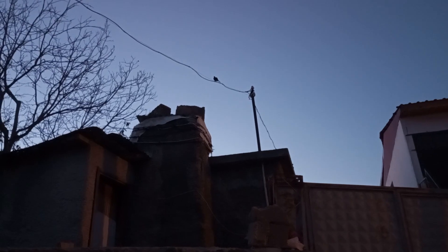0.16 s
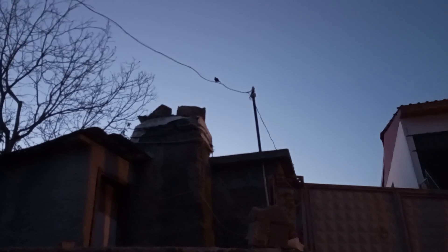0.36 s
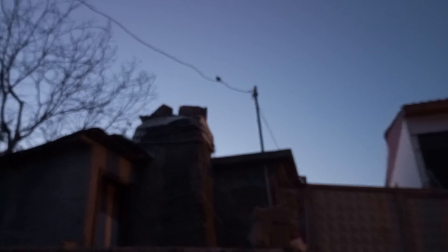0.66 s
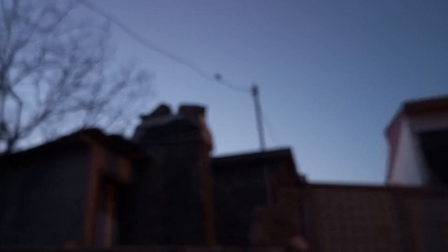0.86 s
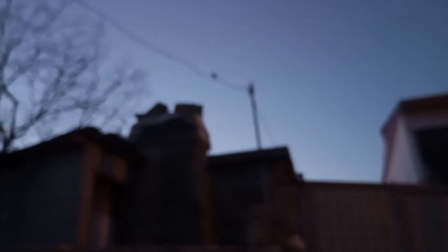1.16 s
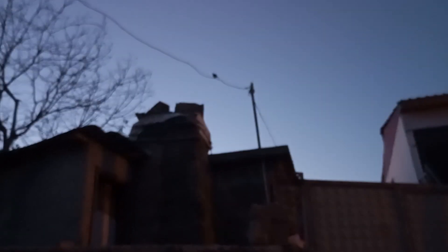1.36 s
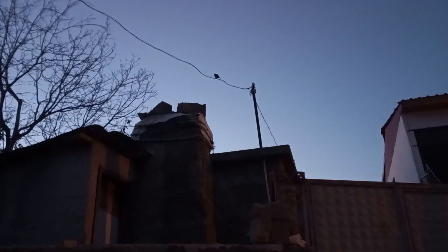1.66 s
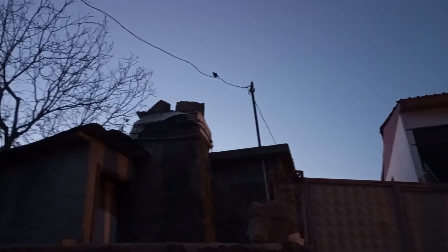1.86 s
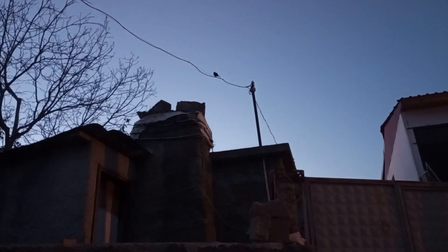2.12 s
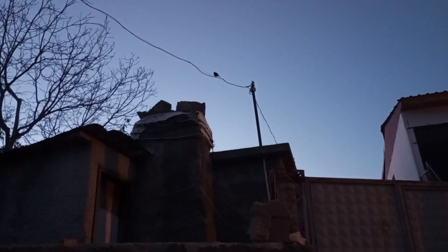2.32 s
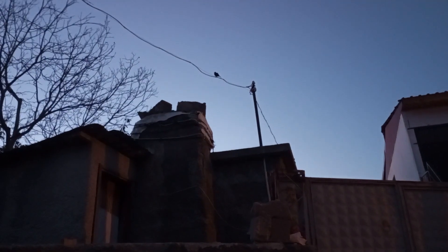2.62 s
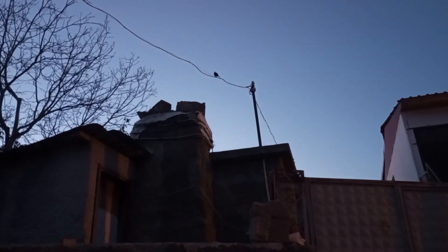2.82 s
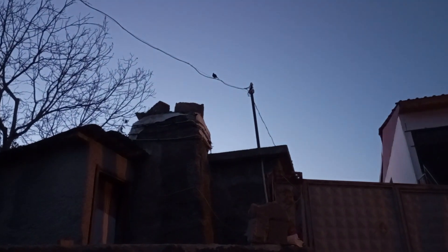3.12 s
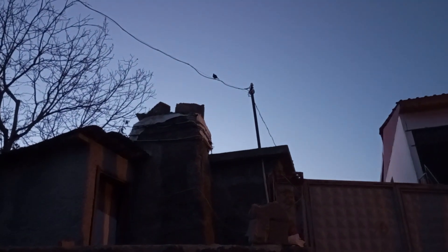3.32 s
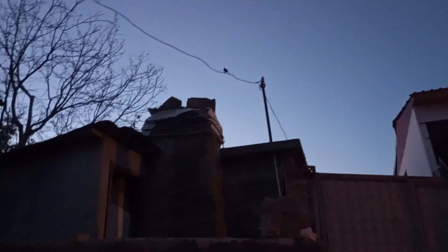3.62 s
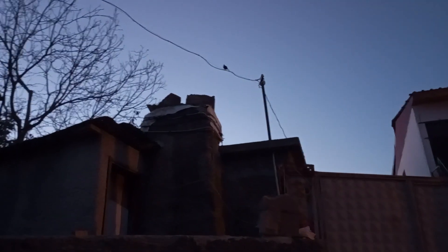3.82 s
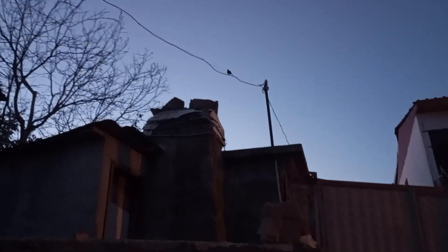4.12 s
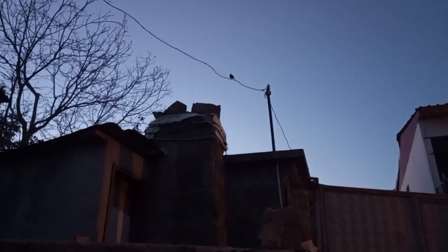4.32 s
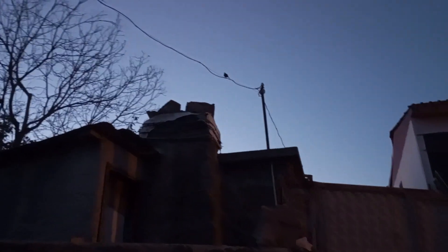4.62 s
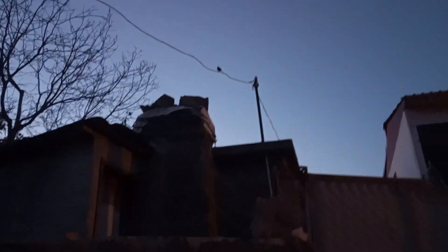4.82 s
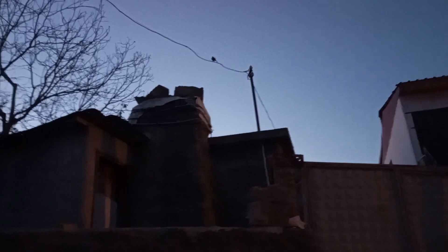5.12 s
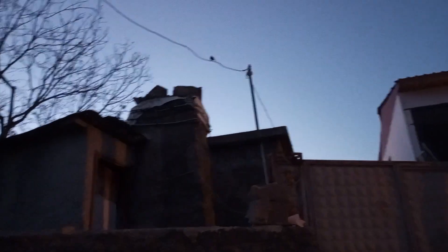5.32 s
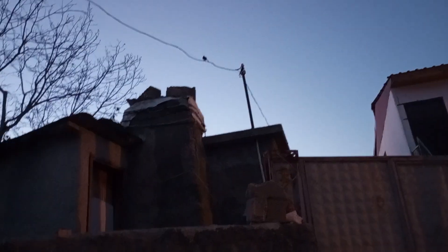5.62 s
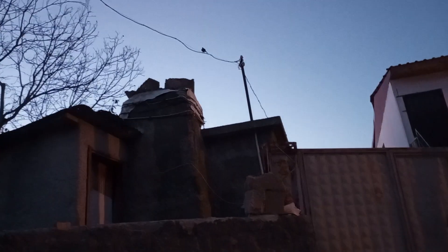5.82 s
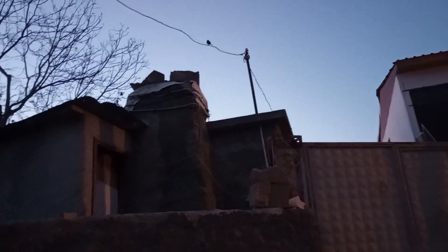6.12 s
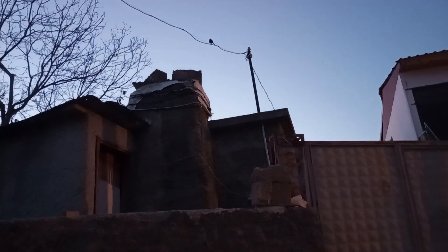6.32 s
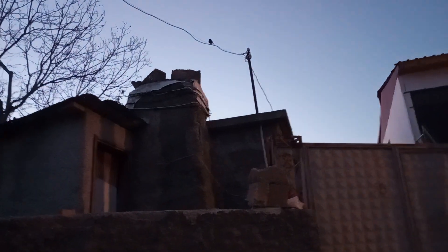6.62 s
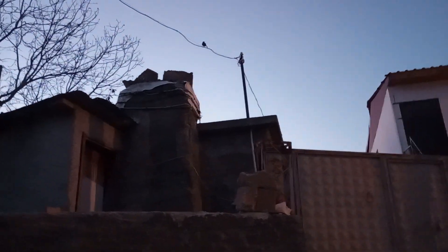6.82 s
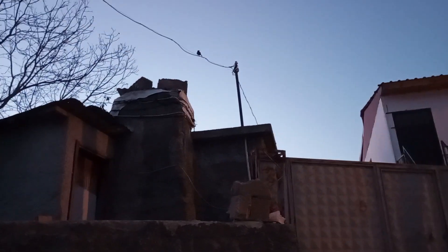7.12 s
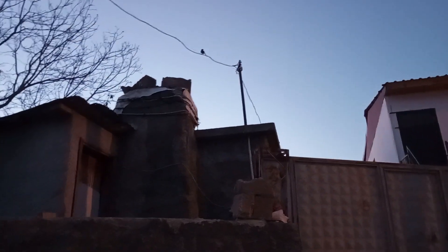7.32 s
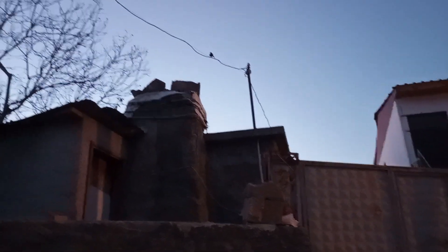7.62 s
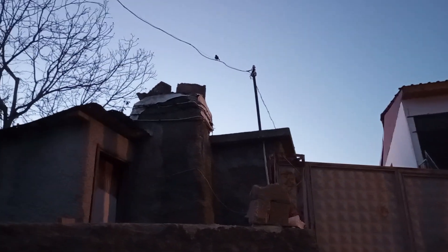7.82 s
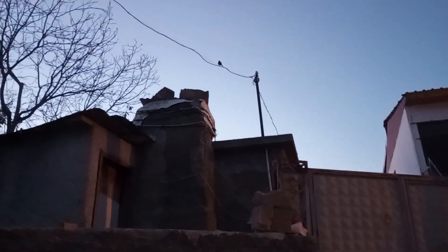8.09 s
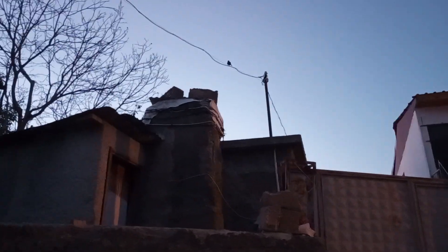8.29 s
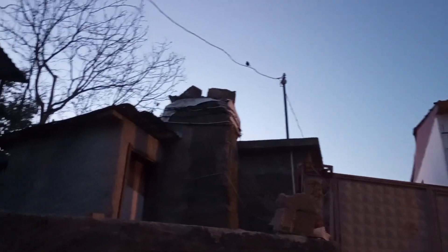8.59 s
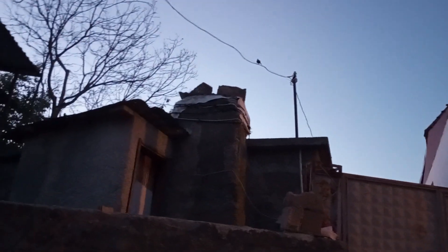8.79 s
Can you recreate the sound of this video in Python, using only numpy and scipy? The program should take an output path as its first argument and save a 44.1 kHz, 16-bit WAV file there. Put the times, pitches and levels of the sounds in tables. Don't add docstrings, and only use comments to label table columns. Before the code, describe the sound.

A hand-held microphone outdoors catches light wind rumble, faint hiss, tiny finger clicks and a soft distant road. Far cockerels crow for about two seconds, then a nearer blackbird whistles, warbles, buzzes and trills, its notes reflecting off house walls. A pause follows, then stronger wind thumps and a second mellow song phrase with a flutter and held whistle, as a car's tyres and drone swell.

```python
import sys
import numpy as np
from scipy import signal
from scipy.fft import rfft, irfft, next_fast_len
from scipy.io import wavfile
from scipy.ndimage import uniform_filter1d, map_coordinates

SR = 44100
rng = np.random.default_rng(int(sys.argv[2]) if len(sys.argv) > 2 else 0)


def makeup_ratio(level_db):
    decades = np.asarray(level_db, float) / 20
    return 10 ** decades


def pcm_store(signal):
    levels = np.round(np.clip(np.atleast_2d(signal), -1, 1) * 32767)
    wavfile.write(sys.argv[1], SR, levels.astype(np.int16).T)


N = 394739


def unit(x):
    return x / np.sqrt(np.mean(x ** 2) + 1e-20)


def along(points, hz):
    point_hz, value = np.transpose(points)
    return np.interp(np.log(hz + 1), np.log(point_hz + 1), value)


def wobble(rate, size=N):
    places = np.arange(size) * np.clip(rate, 0, SR / 41) / SR
    return map_coordinates(rng.standard_normal(size // 40 + 4), [places])


def gain(rows, column=1):
    return makeup_ratio(np.interp(np.arange(N) / SR, *np.transpose(rows)[[0, column]]))


def syllable(rows, edge_s):
    start_s, *columns = np.transpose(rows)
    t = np.arange(int((start_s[-1] - start_s[0]) * SR)) / SR
    window = np.clip(np.minimum(t / 2, t[-1] - t) / edge_s, 0, 1)
    smooth = []
    for column in columns:
        joined = np.interp(t + start_s[0], start_s, column)
        smooth.append(uniform_filter1d(joined, size=200, mode="nearest"))
    return round(start_s[0] * SR), t, window, smooth


def rush(spectrum, patchy_db):
    z = signal.stft(rng.standard_normal(N + SR // 4), nperseg=512)[2]
    patches = uniform_filter1d(rng.standard_normal(z.shape), size=6, axis=0)
    patches = uniform_filter1d(patches, size=14, axis=1)
    noise = signal.istft(z * makeup_ratio(patchy_db * unit(patches)), nperseg=512)[1]
    m = next_fast_len(len(noise))
    colour = makeup_ratio(along(spectrum, np.fft.rfftfreq(m, 1 / SR)))
    return unit(irfft(rfft(noise, m) * colour, m)[:N])


# pitch_hz [Hz], level_db [dB per Hz]
HISS_COLOUR = [(1470, -21.5), (2500, -24), (3170, -12), (3660, -7.5), (4540, 4), (5840, 7.5), (7750, -4),
               (10100, 3.5), (11900, -7.5), (15500, -13)]


def hiss():
    return makeup_ratio(-73 + .4 * wobble(5)) * rush(HISS_COLOUR, patchy_db=.4)


# start_s [s], level_db [dB]
TRAFFIC_SWELL = [(0.0, -52.5), (1.15, -50.5), (1.35, -50), (1.92, -51.5), (2.19, -51), (3.11, -51.5),
                 (7.4, -50), (8.4, -52), (8.95, -49.5)]
# pitch_hz [Hz], level_db [dB per Hz]
ROAD_COLOUR = [(29, -37), (50, -9), (69, 3), (118, -7), (188, -2), (241, 0.5), (294, -4), (428, -5.5),
               (732, -0.5), (845, -1.5), (958, -1.5), (1320, -2.5), (3600, -24.5), (4680, -33),
               (7920, -120)]


def traffic():
    return gain(TRAFFIC_SWELL) * makeup_ratio(-3.0 + 0.14 * wobble(0.78)) * rush(ROAD_COLOUR, patchy_db=1.87)


# start_s [s], tyre_db [dB], drone_db [dB]
CAR_APPROACH = [
    (6.5, -62, -81),
    (7.6, -60, -64),
    (8.2, -53.5, -55.5),
    (8.6, -51, -60.5),
    (8.95, -45.5, -52.5),
]
# pitch_hz [Hz], level_db [dB per Hz]
TYRE_COLOUR = [(250, -40), (500, 5), (1000, 12), (1500, 9), (2000, 2), (2500, -28.5), (5000, -50)]
# pitch_hz [Hz], level_db [dB per Hz]
DRONE_COLOUR = [(480, -52), (590, -11), (625, 3.5), (660, 4), (800, -66.5)]


def car():
    tyres = gain(CAR_APPROACH, column=1) * rush(TYRE_COLOUR, patchy_db=1.5)
    drone = gain(CAR_APPROACH, column=2) * rush(DRONE_COLOUR, patchy_db=3)
    return tyres + drone


# start_s [s], level_db [dB]
BREEZE_CURVE = [(0, -49.5), (.8, -52.5), (1.0, -63), (2.5, -61.5), (3.3, -71), (6.45, -61), (6.9, -43),
                (7.3, -38.5), (8.6, -48), (8.95, -50)]
# peak_s [s], peak_db [dB]
EDDIES = [(0.0, -46), (0.112, -35), (.25, -39), (.32, -36.5), (0.439, -38.5), (0.571, -40.5),
          (0.721, -37.5), (.79, -41), (1.071, -41.5), (1.37, -52), (1.62, -53.5), (2.19, -45),
          (2.39, -50.5), (4.29, -56), (6.69, -41), (7.071, -31.5), (7.155, -34.5), (7.26, -35),
          (7.45, -46.5), (7.59, -35.5), (7.792, -33.5), (7.98, -30), (8.133, -28.5), (8.19, -33),
          (8.35, -33.5), (8.45, -34.5), (8.521, -31), (8.7, -46), (8.8, -40)]


def gusts():
    rise_db_per_s, fall_db_per_s = 276.5, 385
    lull_s, lull_half_s, lull_db = 7.39, 0.05, -22
    t = np.arange(0, N, 100) / SR
    peak_s, peak_db = np.transpose(EDDIES)[:, :, None]
    slope = np.where(t < peak_s, rise_db_per_s, fall_db_per_s)
    eddies = makeup_ratio(peak_db - slope * np.abs(t - peak_s)).max(axis=0)
    lull = makeup_ratio(lull_db * np.clip(1 - np.abs(t - lull_s) / lull_half_s, 0, 1))
    every_sample = np.arange(N) / SR
    strength = np.maximum(gain(BREEZE_CURVE), np.interp(every_sample, t, eddies))
    return strength * np.interp(every_sample, t, lull)


# pitch_hz [Hz], level_db [dB per Hz]
BUFFET_COLOUR = [(20, -41.5), (40, -20), (62, 0.5), (85, 2), (125, 0), (170, -9.5), (275, -23), (400, -39),
                 (600, -85)]


def wind():
    rumble = rush(BUFFET_COLOUR, patchy_db=3.0)
    even = rumble / np.sqrt(np.abs(uniform_filter1d(rumble ** 2, size=SR // 12)) + .2)
    return gusts() * unit(makeup_ratio(3 * wobble(45)) * even)


# start_s [s], peak_db [dB]
FINGER_TICKS = [(0.7762, -48), (1.287, -51), (1.3364, -71), (1.424, -57.5), (1.7064, -53), (1.819, -75),
                (1.9, -61), (2.0193, -50), (2.2643, -64), (2.5657, -60), (3.5093, -73), (4.349, -60),
                (4.875, -57), (5.66, -56), (6.2454, -73), (6.758, -58)]


def ticks():
    out, t = np.zeros(N + SR), np.arange(400) / SR
    for start_s, peak_db in FINGER_TICKS:
        burst = rng.standard_normal(400) * makeup_ratio(-60 * t / 0.0015)
        click = np.diff(uniform_filter1d(burst, size=2))
        out[round(start_s * SR):][:399] += makeup_ratio(peak_db + 2.5) * click / np.abs(click).max()
    return out[:N]


# pitch_hz [Hz], level_db [dB]
THROAT_COLOUR = [(1000, -4.5), (1700, 8.5), (2300, -27.5), (2800, -22.5), (3600, -58), (4400, -51.5)]
# pitch_hz [Hz], level_db [dB]
BEAK_COLOUR = [(3500, -46), (5200, -7.5), (6000, 2), (6800, 0.5), (7800, -30), (9500, -13), (11000, -50.5)]
# (start_s [s], pitch_hz [Hz], level_db [dB])
NEAR_SYLLABLES = [
    (0.0096, -13, -38, [(0.76, 741, -56), (0.812, 737, -57), (0.83, 758.3, -42), (0.968, 739, -47.5), (1.05, 782, -58)]),
    (0.76, -26, -31, [(1.07, 810, -52), (1.15, 886, -52.5), (1.27, 838, -49)]),
    (0.012, 10, -29, [(1.1, 883, -57), (1.16, 881, -52), (1.26, 843, -67)]),
    (0.48, -6, -34.5, [(1.28, 839, -50), (1.37, 919, -40.5), (1.55, 905, -40.5), (1.64, 803, -51.5)]),
    (0.022, -9, -29, [(1.985, 843, -44.5), (2.03, 846, -47), (2.2, 848, -49), (2.33, 860, -50)]),
    (0.44, -1, -25.5, [(2.3, 859.4, -52.5), (2.4, 857, -51), (2.54, 840, -62)]),
    (.1, 9.5, -4, [(2.52, 864, -85.5), (2.78, 831, -73.5)]),
]
FAR_SYLLABLES = [
    (0.043, -14, -35, [(1.08, 769, -65), (1.22, 773, -66), (1.34, 785, -47)]),
    (0.018, -9, -48, [(1.62, 800, -56), (1.74, 769.6, -48), (2.0, 790.3, -50.5)]),
    (0.025, -20, -40, [(2.47, 757, -65.5), (2.55, 749, -44.5), (2.75, 738, -54), (2.86, 710, -60)]),
    (1, -17, -40.5, [(2.3, 965, -59.5), (2.42, 950, -48), (2.56, 930, -61.5)]),
    (0.042, 4.5, -40, [(2.14, 564.4, -69), (2.3, 561.6, -55.5), (2.46, 551.7, -66.5)]),
]


def cockerels():
    out = np.zeros(N + SR)
    for hoarse, fundamental_db, bright_db, rows in NEAR_SYLLABLES + FAR_SYLLABLES:
        start, t, window, (hz, level_db) = syllable(rows, edge_s=0.012)
        shaky_hz = hz * (1 + 0.0039 * wobble(23.7, size=len(t)))
        phase = 2 * np.pi * np.cumsum(shaky_hz) / SR
        voice = makeup_ratio(fundamental_db) * np.exp(1j * phase)
        for k in range(2, 14):
            strength = makeup_ratio(along(THROAT_COLOUR, k * hz)) + makeup_ratio(bright_db + along(BEAK_COLOUR, k * hz))
            voice += strength * np.exp(1j * k * phase)
        beat = wobble(230.8, size=len(t)) + 1j * wobble(230.9, size=len(t))
        beat = beat * np.exp(-2j * np.pi * 110 * t)
        rough = np.sqrt(1 - hoarse) + np.sqrt(hoarse / 2) * beat
        out[start:][:len(t)] += np.sqrt(2) * makeup_ratio(level_db) * window * np.imag(voice * rough)
    return out[:N] * makeup_ratio(1.0 * wobble(29.59))


# rate_hz [Hz], shape [0 down - 1 up], gating [0-1]
FLUTE = (50, .5, 0)
# (start_s [s], pitch_hz [Hz], level_db [dB])
FLUTES = [
    (-17.5, [(2.805, 2056, -38), (2.84, 2270, -38.5), (2.92, 2430, -27), (2.967, 2523, -38)]),
    (14, [(3.605, 1720, -41), (3.62, 1857, -49.5), (3.626, 1996, -44), (3.631, 2510, -35.5), (3.64, 2957, -42.5), (3.725, 2896, -60)]),
    (-4, [(7.03, 2256, -50), (7.06, 2133, -44.5), (7.078, 2040, -47), (7.095, 1860, -43), (7.12, 1705, -41), (7.15, 1616, -47.5), (7.2, 1537, -54.5)]),
    (-15, [(7.785, 2253, -42), (7.81, 2157, -34.5), (7.858, 2138, -34.5), (7.872, 2075, -33), (7.895, 1842, -36), (7.95, 1680, -36), (8.0, 1817, -39.5), (8.047, 1982, -41.5)]),
    (3.5, [(8.762, 1860, -50), (8.79, 1790, -48), (8.89, 1752, -44.5), (8.96, 1705, -38)]),
]


def glides():
    return [(*FLUTE, rich_db, [(*row, 0) for row in rows]) for rich_db, rows in FLUTES]


# rate_hz [Hz], shape [0 down - 1 up], gating [0-1]
WARBLE = (60, 0.49, 0.62)
FLUTTER = (40.8, .5, .45)
LATE_FLUTTER = (42.4, .5, .4)
SETTLE = (60, .5, 0)
# (start_s [s], pitch_hz [Hz], level_db [dB], swing_hz [Hz])
WARBLES = [
    (WARBLE, -17.5, [(2.648, 2864, -43, 30.4), (2.70, 2493, -36, 93), (2.77, 2116, -35.5, 153), (2.81, 2015, -36, 161.4)]),
    (WARBLE, -28, [(3.04, 2210, -27, 13), (3.07, 1783, -24, 35), (3.087, 1551, -44.5, 58), (3.12, 1780, -22, 64), (3.255, 2066, -33.5, 160)]),
    (FLUTTER, -5, [(7.259, 2093, -39.5, 0.84), (7.315, 2132, -33, 7.5), (7.35, 2224, -35, 260), (7.362, 2580, -26, 700), (7.38, 2424, -39, 850), (7.401, 2656, -33.5, 1000)]),
    (SETTLE, -3, [(7.399, 2550, -36, 400), (7.43, 2700, -36, 170), (7.475, 2620, -36, 60), (7.49, 2510, -33, 1), (7.52, 2502, -28.5, 1), (7.59, 2500, -27.5, 1)]),
    (LATE_FLUTTER, -10.5, [(8.042, 1998, -34, 1), (8.11, 2135, -25.5, 47), (8.15, 2420, -29.5, 380), (8.162, 2944, -44.5, 700), (8.19, 2746, -33.5, 220), (8.225, 2660, -33.5, 17)]),
]


def warbles():
    return [(*kind, rich_db, rows) for kind, rich_db, rows in WARBLES]


# (start_s [s], pitch_hz [Hz], level_db [dB], swing_hz [Hz])
BUZZES = [
    (138.4, .7, [(3.71, 2316, -40, 351), (3.745, 2890, -34.5, 460), (3.85, 3140, -34, 479), (3.885, 3420, -50, 695)]),
    (119.3, 0.54, [(4.008, 2306, -38.5, 456), (4.06, 2840, -31, 558), (4.125, 2933, -32, 606)]),
    (123.3, 0.47, [(8.8, 3470, -53, 129), (8.86, 3300, -46, 132.6), (8.91, 3135, -55, 130)]),
    (119, .6, [(8.86, 2920, -46, 80), (8.95, 2480, -60, 79.5)]),
]


def buzzes():
    gating, rich_db = .62, 9
    return [(rate_hz, shape, gating, rich_db, rows) for rate_hz, shape, rows in BUZZES]


# start_s [s], pitch_hz [Hz], level_db [dB], swing_hz [Hz], shape [0 down - 1 up]
TRILL_VOICES = [
    (4.382, 3900, -41, 980, 0.68),
    (4.372, 4820, -40, 440, 0.17),
    (4.39, 7300, -48, 355, .3),
    (4.402, 8050, -39.5, 150, .3),
]


def trill():
    rate_hz, gating, rich_db = 55.8, 0.72, 10.5
    swell_s, swell_from_db, end_s = 0.067, -10, 4.637
    notes = []
    for start_s, hz, db, swing, shape in TRILL_VOICES:
        rows = [(start_s, hz, db + swell_from_db, swing), (start_s + swell_s, hz, db, swing), (end_s, hz, db, swing)]
        notes.append((rate_hz, min(shape, .45), gating, rich_db, rows))
    return notes


# rate_hz [Hz], shape [0 down - 1 up], gating [0-1]
PLAIN = (50, 0.55, 0.21)
# start_s [s], length_s [s], from_hz [Hz], to_hz [Hz], peak_db [dB]
FLICKS = [
    (3.546, 0.036, 2200, 2860, -44.5),
    (3.573, .029, 1792, 2640, -34.5),
    (4.115, .036, 2600, 2830, -36),
    (4.146, .029, 1750, 2630, -35),
]


def flicks():
    bend, early_rise = 0.75, .35
    notes = []
    for start_s, length_s, from_hz, to_hz, peak_db in FLICKS:
        bend_hz = from_hz + early_rise * (to_hz - from_hz)
        rows = [(start_s, from_hz, peak_db - 10, 0), (start_s + bend * length_s, bend_hz, peak_db, 0),
                (start_s + length_s, to_hz, peak_db, 0)]
        notes.append((*PLAIN, 2.5, rows))
    return notes


# start_s [s], length_s [s], from_hz [Hz], to_hz [Hz], peak_db [dB]
SOFT_PIPS = [(3.19, .04, 2770, 2800, -54), (3.891, .062, 2900, 3040, -38), (3.888, .05, 4690, 4720, -49),
             (3.604, .022, 3250, 3480, -49), (4.188, .03, 5200, 5150, -51), (3.895, .029, 1720, 1800, -56),
             (4.563, .063, 3840, 3880, -54), (4.155, .03, 3880, 3900, -53), (4.18, .038, 1870, 1723, -40),
             (4.186, .032, 3420, 3370, -47), (4.69, .03, 5500, 5350, -54)]
SHARP_PIPS = [
    (4.673, 0.025, 3140, 2895, -43.5),
]


def pips():
    crest = .2
    notes = []
    for rich_db, table in [(-2, SOFT_PIPS), (26.5, SHARP_PIPS)]:
        for start_s, length_s, from_hz, to_hz, peak_db in table:
            crest_hz = from_hz + crest * (to_hz - from_hz)
            rows = [(start_s, from_hz, peak_db - 12, 0), (start_s + crest * length_s, crest_hz, peak_db, 0),
                    (start_s + length_s, to_hz, peak_db - 3.5, 0)]
            notes.append((*PLAIN, rich_db, rows))
    return notes


# multiple, level_db [dB under the whistle]
WHISTLE_OVERTONES = [(2, -29.5), (3, -29), (4, -44.5), (5, -33), (6, -38), (7, -30.5), (8, -38), (9, -37)]
# start_s [s], level_db [dB]
BEAK_OPENING = [(2.65, 6), (2.8, -4.5), (2.95, 8.5), (3.05, 2), (3.25, 9), (3.6, -6.5), (3.75, 1.5),
                (3.9, 0), (4.2, -1), (4.6, -4), (7.05, -1), (7.2, 5.5), (7.36, 4), (7.45, 5), (7.55, -11.5),
                (7.82, -6.5), (7.95, 9), (8.15, -0.5)]
# pitch_hz [Hz], level_db [dB]
PORT_COLOUR = [(1500, 8), (2600, -2.3), (3300, 1), (4000, 0.5), (4700, -12.5), (6000, -6.5), (7800, -23),
               (9800, -0.5), (12000, -28.5), (14500, -17), (16000, -16.5)]


def blackbird():
    out = np.zeros(N + SR)
    for rate_hz, shape, gating, rich_db, rows in glides() + warbles() + buzzes() + trill() + flicks() + pips():
        start, t, window, (hz, level_db, swing_hz) = syllable(rows, edge_s=.006)
        size = len(t)
        cycle = (rate_hz * t * (1 + 0.39 * t) + .02 * gating * wobble(90, size=size)) % 1
        height = (.5 + .5 * signal.sawtooth(2 * np.pi * cycle, shape)) ** 1.4
        scatter = .16 * gating * wobble(250, size=size)
        pitch = hz + swing_hz * (uniform_filter1d(2 * height - 1, size=60) + scatter)
        phase = 2 * np.pi * np.cumsum(pitch) / SR

        rich_db = rich_db - 60 * np.abs(np.gradient(np.log(pitch))) * SR / 1000
        beak_db = np.interp(start / SR + t, *np.transpose(BEAK_OPENING))
        partials = [(0.99, 0.0031)]
        for k, overtone_db in WHISTLE_OVERTONES:
            flicker_db = 4 * wobble(60, size=size)
            partials.append((k, overtone_db + rich_db / (k - 1) + beak_db * min(k / 4, 1) + flicker_db))
        blur = .35 * wobble(350, size=size)
        tone = np.zeros(size)
        for k, partial_db in partials:
            strength = makeup_ratio(partial_db + along(PORT_COLOUR, k * pitch)) * (k * pitch < SR / 2)
            tone += strength * np.sin(k * phase + (k - 1) * blur)

        stroke = np.clip(cycle / shape if shape >= .5 else (cycle - shape) / (1 - shape), 0, 1)
        gate = 1 - gating * (1 - np.sin(np.pi * stroke))
        gate = gate * makeup_ratio(gating ** 2 * (3 * wobble(150, size=size) - 38 * height))
        out[start:][:size] += np.sqrt(2) * makeup_ratio(level_db) * window * uniform_filter1d(gate, size=70) * tone
    ground = round(.00319 * SR)
    out[ground:] += makeup_ratio(-4) * out[:-ground].copy()
    return out[:N] * makeup_ratio(.2 + 1.1 * wobble(60))


# pitch_hz [Hz], fall_s [s]
YARD_FALL = [(500, .8), (2000, .75), (5000, .6), (12000, .35)]
# delay_s [s], level_db [dB]
WALL_REPLIES = [(.0052, -7.5), (.011, -15), (.024, -9.5), (.038, -14.5), (.05, -15), (0.0614, -11),
                (.085, -12), (.092, -18), (.113, -16)]


def yard(x, walls_db, tail_db, send=1):
    hz, t, z = signal.stft(rng.standard_normal(SR), SR, nperseg=256)
    fall = makeup_ratio(-60 * t / along(YARD_FALL, hz)[:, None])
    tail = signal.istft(z * fall, SR, nperseg=256)[1]
    reply = makeup_ratio(tail_db) * np.pad(tail / np.linalg.norm(tail), (SR // 100, 0))
    for delay_s, level_db in WALL_REPLIES:
        scatter = rng.standard_normal(1200) * makeup_ratio(-60 * np.arange(1200) / SR / .02)
        reply[round(delay_s * SR):][:1200] += makeup_ratio(level_db + walls_db) * scatter / np.linalg.norm(scatter)
    echo = signal.fftconvolve(x * send, reply)[:N]
    return x + makeup_ratio(3 * wobble(45)) * echo


# start_s [s], level_db [dB]
WALL_SEND = [
    (4.3, 0),
    (4.38, -5),
    (4.62, -5),
    (4.67, 0),
    (7.46, 0),
    (7.5, -13),
    (7.7, -13),
    (7.75, 0),
]


def scene():
    background = hiss() + traffic() + car() + wind() + ticks()
    crows = yard(cockerels(), walls_db=-6.5, tail_db=-6.5)
    song = yard(blackbird(), walls_db=-0.4, tail_db=-12, send=gain(WALL_SEND))
    return (background + crows + song)[None]


def top_cut(x):
    return signal.sosfilt(signal.butter(12, 15680, fs=SR, output="sos"), x)


def record(dry):
    top_hz = 15700
    m = next_fast_len(N)
    below_top = np.fft.rfftfreq(m, 1 / SR) < top_hz
    mix = irfft(rfft(dry, m) * below_top, m)[:, :N]
    return top_cut(mix)


dry = scene()
out = record(dry)
pcm_store(out)
```